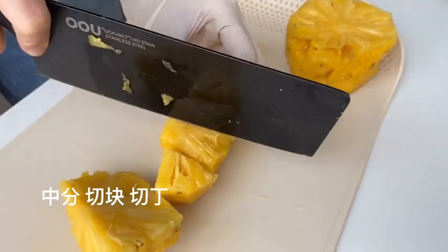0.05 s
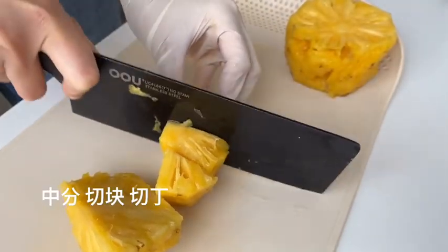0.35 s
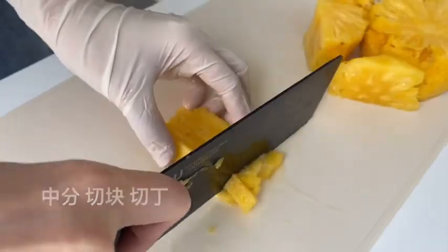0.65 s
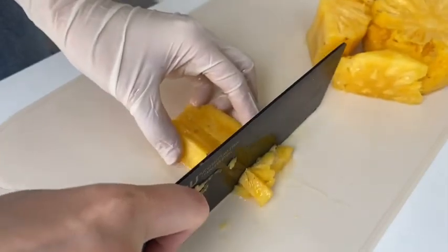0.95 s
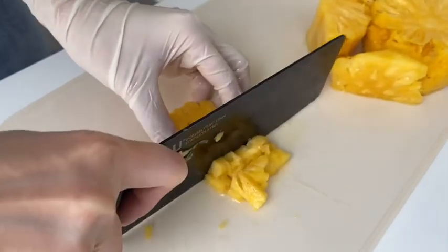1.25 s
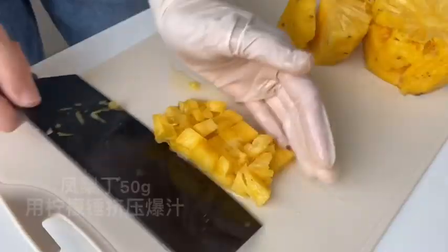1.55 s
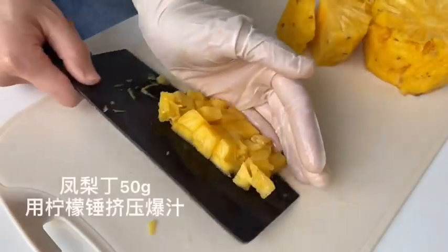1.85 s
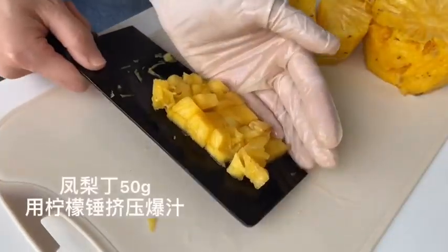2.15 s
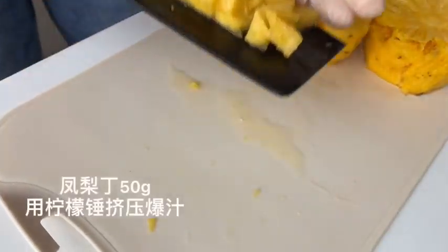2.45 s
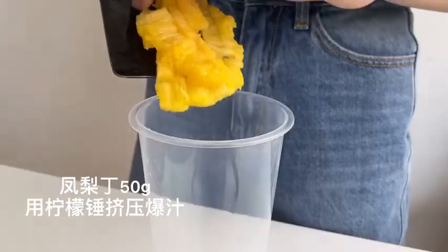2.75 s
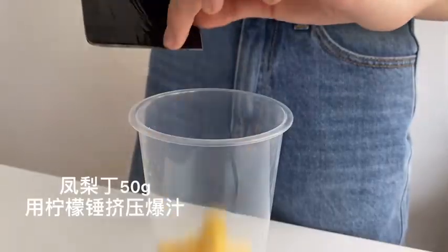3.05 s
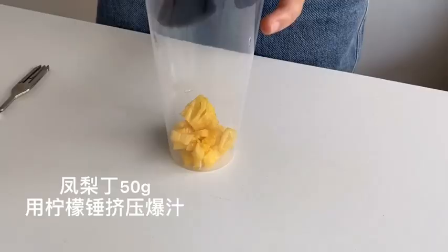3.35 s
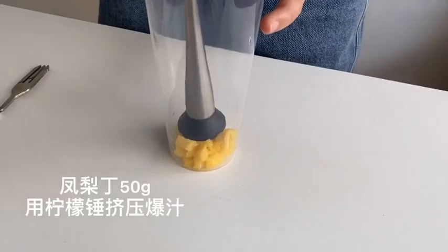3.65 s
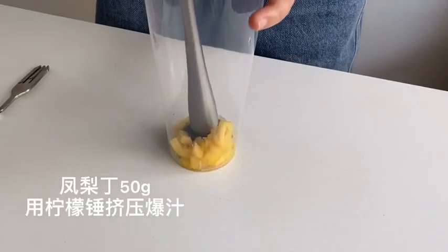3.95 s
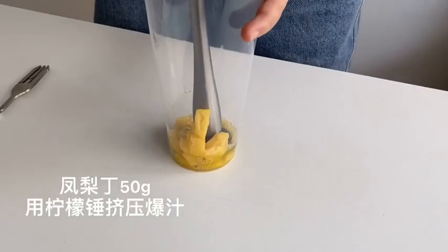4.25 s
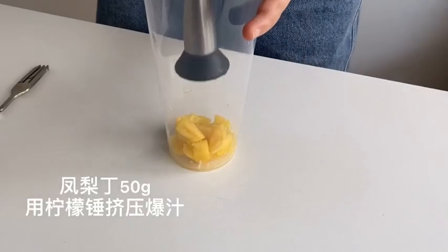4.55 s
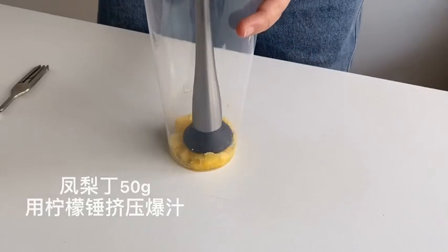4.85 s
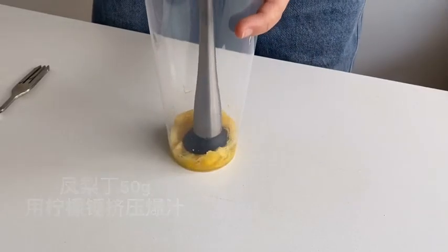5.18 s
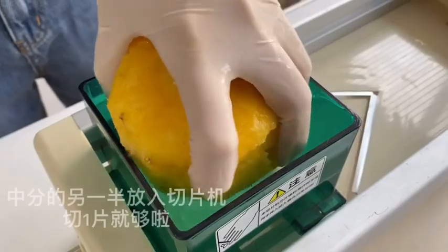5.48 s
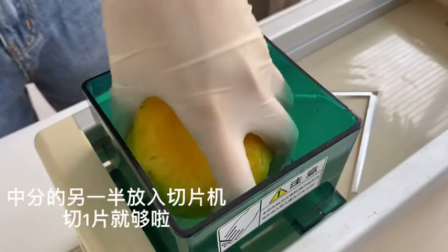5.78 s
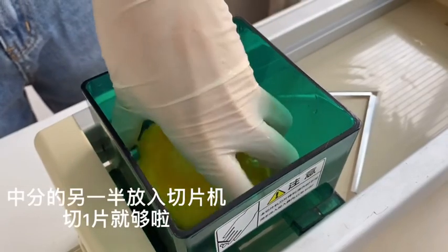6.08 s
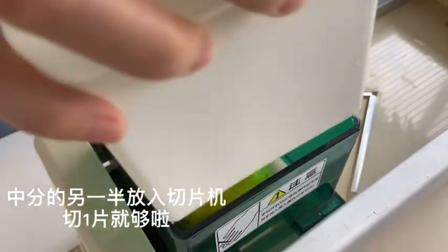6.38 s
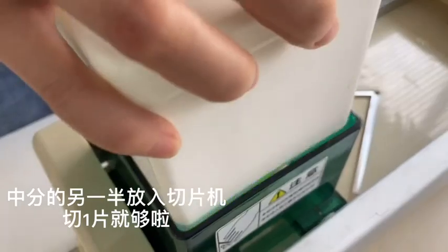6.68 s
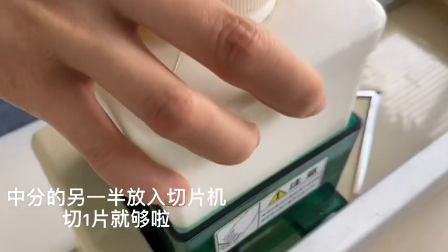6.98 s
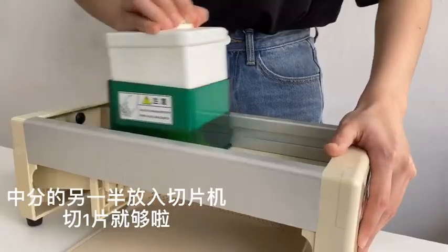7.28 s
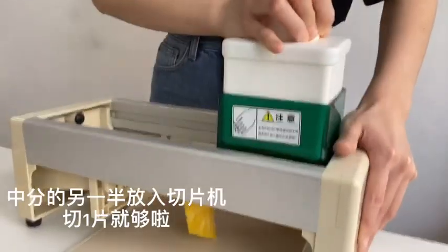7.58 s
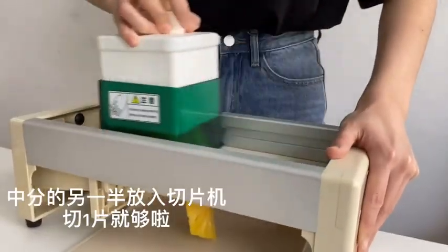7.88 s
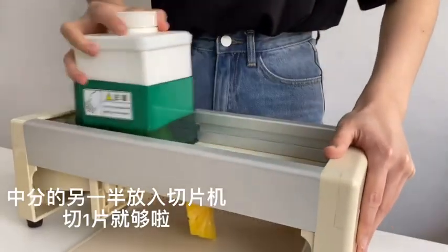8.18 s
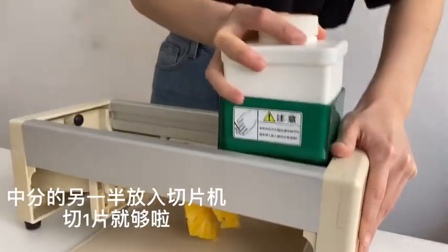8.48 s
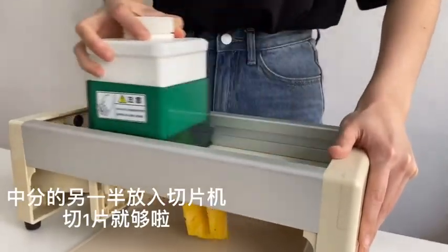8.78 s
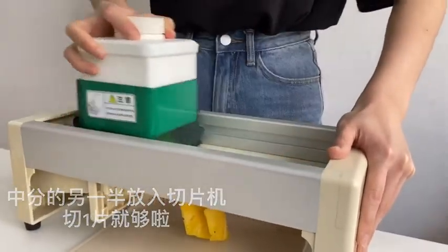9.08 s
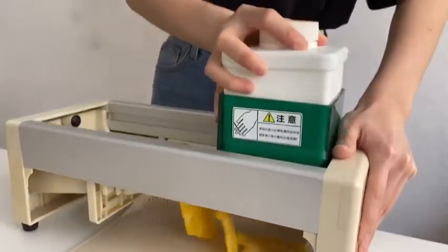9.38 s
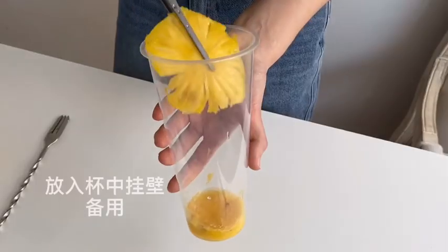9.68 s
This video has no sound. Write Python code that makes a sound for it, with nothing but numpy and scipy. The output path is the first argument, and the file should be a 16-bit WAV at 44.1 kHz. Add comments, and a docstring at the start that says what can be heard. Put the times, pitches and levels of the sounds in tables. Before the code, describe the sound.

A cleaver chops and scrapes on a plastic board, fruit squelches in a cup, then a hand slicer rasps back and forth, knocking.

```python
"""A cleaver crunches through pineapple, knocks on a plastic board and scrapes up the cubes, close by.
They plop into a plastic cup and squelch under a muddler (a crushing stick). A larger piece is pushed
into the hopper (feed box) of a hand slicer, the pusher groans into place, and the sliding carriage
rasps to and fro, hitting its end stops. Knocks are dying tones plus a burst of noise; rubbing is
grainy noise shaped by the thing rubbed. Underneath, the table rumbles and the kitchen hums."""
import sys
import numpy as np
from scipy import signal
from scipy.fft import rfft, irfft, next_fast_len
from scipy.io import wavfile
from scipy.ndimage import map_coordinates

SR = 44100
rng = np.random.default_rng(int(sys.argv[2]) if len(sys.argv) > 2 else 0)


def wav_record(signal):
    """Record a signal, one row per channel, as 16-bit PCM in the file named by sys.argv[1]."""
    frames = np.transpose(np.atleast_2d(signal))
    bounded = np.clip(frames, -1, 1)
    # unit amplitude maps onto the largest positive 16-bit level
    quanta = np.round(bounded * 32767).astype(np.int16)
    wavfile.write(sys.argv[1], SR, quanta)


N = 437901
TIME = np.arange(N) / SR


# The cleaver hits the board: (time [s], level [dB], brightness [dB per band])
CHOPS = [(0.2365, -17, -1.3), (0.5165, -25.5, -2.2), (0.657, -33.5, -1.5), (1.09, -30.5, -3),
         (1.243, -43, -8)]
# The board's ringing tones: (pitch [Hz], level [dB], ring time [s])
BOARD_TONES = [(95, -1, 0.075), (216.5, 10, 0.06), (246, -8.5, 0.23), (380, 0, 0.055), (1172, 14, 0.017),
               (1803, 5.5, 0.029), (2440, -1.5, 0.03)]
# The board's four bands, low to high: (thump [dB], knock [dB], clack [dB], crack [dB])
BOARD_COLOUR = (0.5, -9.5, -0.5, -8)
# The edge moves through fruit: (start [s], length [s], level [dB])
CUTS = [(0.0, 0.26, -48), (0.148, 0.23, -32.5), (0.48, 0.051, -37.5), (0.57, 0.2, -42), (1.0, 0.077, -41.5),
        (1.095, 0.065, -35.5)]
# Tone of tearing fibres: (frequency [Hz], level [dB])
CRUNCH_TONE = [(250, -15), (500, -4.5), (1000, -7), (1900, -7.5), (3500, -14), (7000, -17), (16000, -16)]

def cleaver_chops(cutting):
    """The edge crunches through wet fibres and lands on the board; both make the board ring."""
    board_ring = [(hz, np.log(1000) / np.pi / ring_s, 5) for hz, _, ring_s in BOARD_TONES]  # 5 dB boost
    crunch = friction(cutting, CRUNCH_TONE, board_ring,
                      grain_db=3.5, grain_hz=1400, surge_db=3, surge_hz=170)
    chops = blows(CHOPS, BOARD_TONES, BOARD_COLOUR,
                  contact_s=.00008, noise_db=1, noise_s=.052, crack_s=.012, rise_cycles=.28)
    return pan(crunch + chops, left_db=1.5)


# The flat blade sweeps the board: (start [s], length [s], level [dB], pitch [ratio])
SCRAPES = [(1.442, 0.063, -26.5, 1.015), (1.603, 0.048, -31.5, 0.95), (1.78, 0.051, -24, 1.065)]
# Tone of the scrape: (frequency [Hz], level [dB])
SCRAPE_TONE = [(450, -20.5), (680, -13.5), (820, -4), (2000, -10.5), (3200, -11.5), (5800, -11),
               (7500, -18), (15000, -20)]
# The blade sings: (pitch [Hz], width [Hz], boost [dB])
BLADE_RING = [(830, 50, 7), (1320, 35, 11), (1750, 60, 8), (2865, 55, 12), (4640, 80, 7), (5380, 70, 6)]
# The edge catches and judders: (start [s], length [s], level [dB])
JUDDERS = [(1.443, 0.075, -36.5), (1.598, 0.15, -41.5), (1.753, 0.021, -31)]
# Tone of the judder: (frequency [Hz], level [dB])
JUDDER_TONE = [(400, -11), (850, -15), (1800, -8.5), (5000, -19.5)]
# The caught edge rings: (pitch [Hz], width [Hz], boost [dB])
JUDDER_RING = [(910, 85, 33), (1723, 44, 17)]

def cleaver_scrapes():
    """The blade rasps at a new pitch each stroke and grows duller as it fills with fruit."""
    rasp = friction(1, SCRAPE_TONE, BLADE_RING, grain_db=2.5, grain_hz=800, surge_db=1, surge_hz=130)
    strokes = 0
    for *stroke, pitch in SCRAPES:
        pressure = envelope([stroke], attack_s=.032, release_s=.14)
        strokes += pressure * bend(rasp, pitch + .008 * drift(40, N))
    fullness = np.interp(TIME, [SCRAPES[0][0], SCRAPES[-1][0]], [0, 1])
    scrape = bass_and_treble(strokes, split_hz=2800, low_db=0, high_db=3 - 14.5 * fullness)
    judder = friction(envelope(JUDDERS, attack_s=.0048, release_s=.14), JUDDER_TONE, JUDDER_RING,
                      grain_db=1.5, grain_hz=260, surge_db=-.5, surge_hz=140)
    return pan(scrape + judder, left_db=3.5)


# The carriage hits an end stop: (time [s], level [dB], brightness [dB per band])
CARRIAGE_STOPS = [(7.4225, -18.5, -1.3), (8.344, -19, 1), (9.2195, -19.5, 0)]
# The carriage's tones: (pitch [Hz], level [dB], ring time [s])
CARRIAGE_TONES = [(150, -4, .08), (215, 0, .07), (370, -8, .06), (620, -7, .03), (750, 2, .032),
                  (1240, 0, .02), (2150, 0, .018), (3450, -3, .014)]
# The carriage's bands: (thump [dB], knock [dB], clack [dB], crack [dB])
CARRIAGE_COLOUR = (-6, 8, 1, -4.5)
# Return strokes, and the frame dropping on its feet: (time [s], level [dB], brightness [dB per band])
FRAME_BUMPS = [(7.5025, -19.5, -4.8), (7.953, -26, -1.7), (7.962, -28, -2), (8.385, -35, -7),
               (8.845, -26, -3.6), (9.258, -25, -7.4)]
# The frame's tones: (pitch [Hz], level [dB], ring time [s])
FRAME_TONES = [(148, 8, .1), (220, 2, .1), (365, 5, .035), (590, 8, .03), (1450, 8, .012), (2250, 0, .028)]
# The frame's bands: (thump [dB], knock [dB], clack [dB], crack [dB])
FRAME_COLOUR = (-4, 6, 1, -3)

def slicer_knocks():
    """Each stroke ends in a knock that rings the carriage or the frame."""
    stops = blows(CARRIAGE_STOPS, CARRIAGE_TONES, CARRIAGE_COLOUR,
                  contact_s=.0035, noise_db=-3, noise_s=.035, crack_s=.03, rise_cycles=1.3)
    bumps = blows(FRAME_BUMPS, FRAME_TONES, FRAME_COLOUR,
                  contact_s=.002, noise_db=-6, noise_s=.03, crack_s=.025, rise_cycles=.6)
    return pan(stops + bumps, left_db=1.5)


# The carriage slides to and fro: (start [s], length [s], level [dB])
TRAVELS = [(7.07, 0.014, -28.5), (7.125, 0.28, -30.5), (7.56, 0.37, -36), (8.1, 0.23, -30.5),
           (8.45, 0.36, -35.5), (8.9, 0.28, -34)]
# The slicer's blade bites the fruit: (start [s], length [s], level [dB])
BITES = [(8.104, 0.038, -27), (8.148, 0.027, -35), (9.071, 0.011, -26), (9.085, 0.082, -33.5)]
# Tone of the rails: (frequency [Hz], level [dB])
RAIL_TONE = [(110, -16.5), (190, 5), (380, 4.5), (1100, 5), (2000, 4.5), (3200, 3), (5000, -8.5),
             (9000, -52)]
# The rails ring: (pitch [Hz], width [Hz], boost [dB])
RAIL_RING = [(365, 50, 6), (545, 50, 9), (835, 55, 7), (1110, 60, 2), (1590, 100, 7), (2070, 110, 6),
             (3750, 160, 6)]
# Tone of the blade's hiss: (frequency [Hz], level [dB])
SLICE_TONE = [(2000, -26.5), (3600, -5.5), (5500, -1.5), (8000, -7), (11500, -6), (15500, -13.5)]

def slicer_strokes(travel):
    """The carriage rasps on its rails, the frame drones, and the blade hisses more when pushed harder."""
    graze_s = .011  # the carriage brushes each stop just before it hits
    grazes = [(s - graze_s, graze_s, -17) for s, _, _ in CARRIAGE_STOPS]
    grazing = envelope(grazes, attack_s=graze_s, release_s=.019)
    rasp = friction(1, RAIL_TONE, RAIL_RING, grain_db=3.5, grain_hz=350, surge_db=3.5, surge_hz=40)
    rails = (travel + grazing) * bend(rasp, 1 + .04 * drift(10, N))
    slicing = from_db(-30) * (travel / from_db(-28)) ** 1.54  # 1.54 dB more hiss per dB of rubbing
    hiss = friction(slicing, SLICE_TONE, [(5050, 200, 4.1)],
                    grain_db=3, grain_hz=900, surge_db=3, surge_hz=120)
    drone = from_db(-13.5) * travel * body(noise(N), RUMBLE_TONE, [(148, 28, 16)])
    return pan(rails + hiss + drone, left_db=1.5)


# Fruit and pusher hit the hopper: (time [s], level [dB], brightness [dB per band])
HOPPER_KNOCKS = [(5.411, -34, 2), (5.648, -38, -2.5), (5.792, -44, 7), (5.831, -37, 2.5), (6.012, -39, -2),
                 (6.065, -33.5, -3.5), (6.084, -40, -9.5), (6.135, -51, -10.5), (6.162, -28, 1.5),
                 (6.222, -22.5, -0.5), (6.26, -32, 4.5), (6.289, -46, -14.5), (6.55, -33.5, -1),
                 (6.568, -28, 0.5), (6.604, -29, 3), (6.617, -28, 1), (6.985, -46, -8.5)]
# The hopper's tones: (pitch [Hz], level [dB], ring time [s])
HOPPER_TONES = [(72, -4, .14), (98, 2, .14), (128, -3, .09), (245, -1, .07), (400, -4, .035), (640, 0, .04),
                (921, -1, .05), (1400, 0, .015), (2270, -3, .02), (3850, -3, .012)]
# The hopper's bands: (thump [dB], knock [dB], clack [dB], crack [dB])
HOPPER_COLOUR = (0.92, -0.36, -2, 0.43)
# Fruit and pusher rub the walls: (start [s], length [s], level [dB])
RUBS = [(5.392, 0.16, -38), (5.65, 0.21, -38), (6.01, 0.18, -40.5), (6.214, 0.018, -20.5),
        (6.45, 0.029, -29.5), (6.56, 0.13, -30), (6.63, 0.12, -33.5), (6.95, 0.043, -38)]
# Tone of the walls: (frequency [Hz], level [dB])
WALL_TONE = [(220, -21), (380, 4.5), (700, 1), (1200, -4), (2300, -5.5), (4500, -11), (8000, -17.5),
             (16000, -41)]
# Wet fruit and a rubber glove stick and slip: (start [s], length [s], level [dB])
SLIPS = [(5.402, .022, -24.5), (5.463, 0.011, -27.5), (5.522, 0.0085, -32), (5.708, 0.019, -36),
         (5.791, 0.01, -26.5), (5.828, 0.0047, -22.5)]
# Tone of a slip: (frequency [Hz], level [dB])
SLIP_TONE = [(300, -11.5), (800, 3), (2500, -4.5), (4200, -3), (7000, -11), (16000, -18)]
# The pusher jams and groans: (start [s], length [s], level [dB])
GROANS = [(6.163, 0.023, -23), (6.213, 0.022, -30), (6.45, 0.12, -45), (6.565, 0.074, -26.5),
          (6.65, 0.095, -30.5), (6.75, 0.21, -35.5), (6.955, 0.022, -27.5)]
# Tone of the groan: (frequency [Hz], level [dB])
GROAN_TONE = [(150, -10), (330, -1.5), (1000, -3.5), (2300, -11.5), (2800, -16), (8000, -28.5)]
# The rubbed box rings: (pitch [Hz], width [Hz], boost [dB])
HOPPER_RING = [(650, 100, 7), (922, 40, 17), (1380, 60, 7), (2270, 70, 9), (3780, 70, 9)]

def hopper(rubbing):
    """Wet fruit slips into a hollow plastic box; the pusher knocks, rubs and groans with a wavy pitch."""
    knocks = blows(HOPPER_KNOCKS, HOPPER_TONES, HOPPER_COLOUR,
                   contact_s=.003, noise_db=-2, noise_s=.045, crack_s=.035, rise_cycles=1)
    rub = friction(rubbing, WALL_TONE, HOPPER_RING, grain_db=3.5, grain_hz=580, surge_db=2, surge_hz=100)
    slips = friction(envelope(SLIPS, attack_s=.0017, release_s=.027), SLIP_TONE, [],
                     grain_db=2.5, grain_hz=1300, surge_db=-1, surge_hz=200)
    hollow = friction(.97, GROAN_TONE, HOPPER_RING, grain_db=.5, grain_hz=170, surge_db=-5, surge_hz=150)
    groan = envelope(GROANS, attack_s=.009, release_s=.13) * bend(hollow, 1 + .015 * drift(18, N))
    return pan(knocks + rub + slips + groan, left_db=1.7)


# Cubes and muddler tap the cup: (time [s], level [dB], brightness [dB per band])
CUP_TAPS = [(3.007, -33, -2.5), (3.055, -29, -2.5), (3.563, -51.5, 1.5), (4.276, -47, -5),
            (4.343, -46, -3.5)]
# The cup's tones: (pitch [Hz], level [dB], ring time [s])
CUP_TONES = [(517.7, 12, 0.16), (860, 17, 0.013), (1330, 28, 0.0095), (1580, 4.7, 0.0069)]
# The cup's bands: (thump [dB], knock [dB], clack [dB], crack [dB])
CUP_COLOUR = (-10, 7, 4, -6)
# The muddler bumps the table through the cup: (time [s], level [dB], brightness [dB per band])
MUDDLER_BUMPS = [(4.616, -33, -3.3), (5.238, -47, -8.5)]
# The table's tones: (pitch [Hz], level [dB], ring time [s])
TABLE_TONES = [(152, -2.2, 0.049), (198, 0, 0.029), (423, 0, 0.011), (1360, 0, 0.0042)]
# The table's bands: (thump [dB], knock [dB], clack [dB], crack [dB])
TABLE_COLOUR = (-0.28, 0.13, -0.18, -0.31)
# Wet pulp is squashed: (start [s], length [s], level [dB])
SQUELCHES = [(2.995, 0.053, -39.5), (3.575, 0.028, -48), (3.72, 0.14, -51.5), (3.845, 0.044, -40.5),
             (3.95, 0.2, -54), (4.27, 0.092, -47), (4.66, 0.22, -51), (4.86, 0.051, -41.5),
             (4.97, 0.25, -57)]
# Tone of the pulp: (frequency [Hz], level [dB])
PULP_TONE = [(250, 11), (500, 1.5), (900, 0.5), (1600, -2), (3000, -1.5), (6000, -8), (16000, -14)]
# The cup rings around it: (pitch [Hz], width [Hz], boost [dB])
CUP_RING = [(512, 45, 15), (1400, 260, 5)]
# Juice squirts past the muddler: (start [s], length [s], level [dB])
SQUIRTS = [(3.733, 0.0093, -38), (4.273, 0.0058, -35.5)]
# Tone of a wet hiss: (frequency [Hz], level [dB])
WET_TONE = [(1500, -12), (3200, -6), (5000, -7.5), (6800, 1), (8500, -18), (15000, -11)]
# The squirt whistles: (pitch [Hz], width [Hz], boost [dB])
SQUIRT_RING = [(4300, 90, 8.7), (5300, 160, 13)]

def cup():
    """Cubes drop into the cup; the muddler squashes out their juice and bumps the table."""
    taps = blows(CUP_TAPS, CUP_TONES, CUP_COLOUR,
                 contact_s=.00045, noise_db=-3, noise_s=.025, crack_s=.013, rise_cycles=.62)
    bumps = blows(MUDDLER_BUMPS, TABLE_TONES, TABLE_COLOUR,
                  contact_s=.00011, noise_db=-4, noise_s=.029, crack_s=.0013, rise_cycles=.38)
    squelch = friction(envelope(SQUELCHES, attack_s=.0026, release_s=.33), PULP_TONE, CUP_RING,
                       grain_db=4.5, grain_hz=2000, surge_db=3, surge_hz=100)
    squirt = friction(envelope(SQUIRTS, attack_s=.004, release_s=.09), WET_TONE, SQUIRT_RING,
                      grain_db=3.5, grain_hz=900, surge_db=1.5, surge_hz=150)
    return pan(taps + bumps + squelch + squirt, left_db=2.5)


# Fibres snap and juice ticks: (time [s], level [dB], pitch [Hz])
TICKS = [(3.598, -43, 3130), (3.870, -40.5, 3140), (4.713, -42, 4300), (5.054, -47.5, 4130),
         (5.619, -37, 3320), (5.661, -30, 4600), (5.768, -31, 4000), (6.132, -30, 11300),
         (7.32, -30.5, 6300), (7.72, -40.5, 4830), (7.774, -32, 5770), (7.822, -31, 5850),
         (8.045, -28, 4600), (8.236, -26.5, 5020), (8.656, -34, 4800), (8.71, -29, 4800),
         (8.805, -31, 4800)]

def ticks():
    """A fibre or a film of juice lets go with a short snap, strongest around its own pitch."""
    out, t = np.zeros((2, N)), np.arange(SR // 16) / SR
    for s, db, hz in TICKS:
        burst = spread(noise(len(t)), hz) * from_db(-60 * t / .032) * np.minimum(t / .002, 1)
        snap = band(burst, hz / 1.113, hz * 1.113) + from_db(-5) * band(burst, hz / 4.7, hz * 2)
        add(out, s, from_db(db) * snap / np.std(snap[:, t < .006]))
    return out


# Hollow pops and rubbery squeaks under wet fruit: (start [s], length [s], level [dB], pitch [Hz])
POPS = [(2.976, 0.022, -39, 564), (3.026, 0.004, -24.5, 1300), (5.394, 0.02, -30, 736),
        (5.646, 0.011, -15.5, 703)]

def pops():
    """A squeezed-out pocket of air, or a rubbery squeak, sounds for a moment, sagging in pitch."""
    out, t = np.zeros((2, N)), np.arange(SR // 20) / SR
    sag = np.exp(-8.6 * t)
    for s, length, db, hz in POPS:
        phase = 2 * np.pi * hz * np.cumsum(sag) / SR
        level = np.minimum(t / .003, 1) * from_db(db - 60 * np.maximum(t - length, 0) / .025)
        add(out, s, (level * np.sin(phase))[None])
    return out


# Wet fruit slides in the cup: (start [s], length [s], level [dB])
SLICE_SLIDES = [(9.61, 0.23, -55.5)]

def wet_slice():
    """A thin slice hisses along the wall of the cup."""
    slide = envelope(SLICE_SLIDES, attack_s=.033, release_s=.49)
    hiss = friction(slide, WET_TONE, [], grain_db=3.5, grain_hz=2100, surge_db=-1, surge_hz=55)
    return pan(hiss, left_db=3.5)


# The kitchen's echo: (frequency [Hz], ring time [s], level [dB])
KITCHEN_ECHO = [(150, 0.3, -26.5), (372, 0.22, -23.5), (830, 0.33, -27.5), (2200, 0.33, -21),
                (5000, .25, -18), (11000, 0.11, -19.5)]

def kitchen_echo(x):
    """Many reflections blur into a short tail that dies soonest in the high treble."""
    t, response = np.arange(SR // 2) / SR, 0
    build_up = np.minimum(t / .0075, 1) ** 2
    for hz in 90 * 2. ** np.arange(8):
        tail = band(spread(noise(len(t)), hz), hz / np.sqrt(2), hz * np.sqrt(2))
        tail *= from_db(-60 * t / at_hz(KITCHEN_ECHO, hz)) * build_up
        response += from_db(at_hz(KITCHEN_ECHO, hz, column=2)) * unit_power(tail) / np.sqrt(len(t))
    return signal.fftconvolve(x, response, axes=1)[:, :N]


# The background steps to new levels at set times: (start [s], hum [dB], rumble [dB], air [dB], hiss [dB])
BACKGROUND_STEPS = [(0, -47.5, -47, -37, -90), (2.61, -48, -50.5, -46, -71.5),
                    (3.305, -46, -52, -36.5, -76.5), (5.272, -71, -44, -32.5, -59),
                    (7.07, -60.5, -39.5, -42, -70.5), (9.38, -52, -52.5, -43, -85)]
# Tone of the room: (frequency [Hz], level [dB])
ROOM_TONE = [(20, -24), (35, -8.5), (58, 9), (85, -11.5), (300, -30), (1000, -30.5), (2000, -38.5),
             (4000, -55), (16000, -61.5)]
# Tone of the table's rumble and the slicer's drone: (frequency [Hz], level [dB])
RUMBLE_TONE = [(20, -30.5), (40, -16.5), (90, -3.5), (150, 5.5), (230, 2.5), (330, 1.5), (480, -15.5),
               (900, -28.5), (3000, -65.5)]

def background(shaking):
    """Hum and soft air fill the room; the table rumbles under the hands, more when they rub or cut."""
    steps = np.array(BACKGROUND_STEPS)
    hum_db, rumble_db, air_db, hiss_db = steps[np.searchsorted(steps[1:, 0], TIME), 1:].T
    room = bass_and_treble(body(noise(N), ROOM_TONE), split_hz=130, low_db=hum_db, high_db=air_db)
    rumble = friction(np.hypot(from_db(rumble_db), shaking), RUMBLE_TONE, [],
                      grain_db=1.5, grain_hz=200, surge_db=2, surge_hz=25)
    hiss = from_db(hiss_db) * unit_power(band(noise(N), 2600, 7400))
    return room + rumble + hiss


# Borders of the thump, knock, clack and crack bands: (frequency [Hz])
BAND_EDGES = [50, 300, 1100, 3400, 9500]

def blows(hits, tones, colour_db, contact_s, noise_db, noise_s, crack_s, rise_cycles):
    """Each hit rings an object's main tones over a quickly dying burst of noise, band by band."""
    out, t = np.zeros((2, N)), np.arange(SR // 4) / SR
    attack = t < .018
    for s, level_db, brightness_db in hits:
        levels = level_db + np.array(colour_db) + brightness_db * (np.arange(4) - 1.5)
        for low, high, db in zip(BAND_EDGES, BAND_EDGES[1:], levels):
            centre = np.sqrt(low * high)
            band_tones = [tone for tone in tones if low <= tone[0] < high]
            fade_s = noise_s * (1000 / centre) ** .4 if band_tones else crack_s
            contact = 1 - np.exp(-(t / contact_s) ** 2)  # the surfaces take a moment to meet fully
            burst = band(spread(noise(len(t)), centre) * contact * from_db(-60 * t / fade_s), low, high)
            ring = ringing(band_tones, t, rise_cycles)
            sound = from_db(noise_db) * burst / np.std(burst[:, attack])
            sound += ring / (np.std(ring[:, attack]) + 1e-12)
            add(out, s, from_db(db) * sound / np.std(sound[:, attack]))
    return out


def ringing(tones, t, rise_cycles):
    """Struck tones swell, low ones more slowly, and fall by 60 dB in their ring time."""
    ring = np.zeros((2, len(t)))
    for hz, db, ring_s in tones:
        strength, detune, direction = rng.standard_normal(3)
        # each tone spreads its own way and reaches left and right out of step
        skew = (.3 * direction - 1) * np.arccos(at_hz(LIKENESS, hz)) / 3
        wave = np.sin(2 * np.pi * hz * (1 + .02 * detune) * t + np.array([[-skew], [skew]]))
        swell = 1 - np.exp(-(t * hz / rise_cycles) ** 2)
        ring += wave * swell * from_db(db + 1.5 * strength - 60 * t / ring_s)
    return ring


def friction(gain, tone, rings, grain_db, grain_hz, surge_db, surge_hz):
    """Tiny uneven slips (grain), bunched in slower surges, shake an object while it is rubbed."""
    force, shared = 0, drift(surge_hz, N)
    # coarse, medium and fine slips share only part of each surge
    for low, high in [(20, 1500), (1500, 5000), (5000, 18000)]:
        surge = np.minimum((shared + drift(surge_hz, N)) / np.sqrt(2), 2)
        grain = np.minimum(drift(grain_hz, N), 3)
        force += band(noise(N) * from_db(grain_db * grain + surge_db * surge), low, high)
    return gain * body(force, tone, rings)


def body(force, tone, rings=()):
    """An object gives a force its broad tone and boosts the pitches it rings at; the power is 1."""
    size = next_fast_len(force.shape[1] + SR // 8, real=True)
    hz = np.arange(size // 2 + 1) * SR / size
    boost = 1 + sum((from_db(db) - 1) / (1 + 2j * (hz - pitch) / width) for pitch, width, db in rings)
    sound = irfft(spread(rfft(force, size), hz) * from_db(at_hz(tone, hz)) * boost, size)
    return unit_power(sound[:, :force.shape[1]])


def envelope(rows, attack_s, release_s):
    """Loudness over time: each contact builds up, holds, then dies by 60 dB in release_s."""
    power = 0
    for start, length, db in rows:
        rise = np.clip((TIME - start) / attack_s, 0, 1)
        released = np.clip((TIME - start - length) / release_s, 0, 2)
        power += (rise * from_db(db - 60 * released)) ** 2
    return np.sqrt(power)


# How alike left and right are: (frequency [Hz], likeness [0-1])
LIKENESS = [(60, .97), (300, .83), (700, .62), (2000, .45), (11000, .65)]

def spread(pair, hz):
    """Blend two unrelated signals into left and right, most alike in the bass."""
    alike = at_hz(LIKENESS, hz)
    mid, side = np.sqrt((1 + alike) / 2) * pair[0], np.sqrt((1 - alike) / 2) * pair[1]
    return np.array([mid + side, mid - side])


def pan(x, left_db):
    """Lean a sound to the left."""
    return x * from_db([[left_db / 2], [-left_db / 2]])


def bend(x, ratio):
    """Bend a steady sound's pitch by playing it at a changing speed."""
    return np.array([map_coordinates(side, [np.cumsum(ratio)], order=3, mode="mirror") for side in x])


def drift(rate, size):
    """A random wander of power 1 that turns rate times a second."""
    points = rng.standard_normal(size // 8)
    return unit_power(np.interp(TIME[:size] * rate, np.arange(len(points)), points))


def noise(size):
    """Two channels of white noise."""
    return rng.standard_normal((2, size))


def band(x, low, high):
    """Keep the frequencies from low to high."""
    return signal.sosfilt(signal.butter(2, [low, min(high, .45 * SR)], "band", fs=SR, output="sos"), x)


def bass_and_treble(x, split_hz, low_db, high_db):
    """Set separate levels below and above split_hz."""
    return from_db(low_db) * band(x, 12, split_hz) - from_db(high_db) * band(x, split_hz, 19000)


def at_hz(table, hz, column=1):
    """Read between a table's rows on a log-frequency scale."""
    table = np.array(table)
    return np.interp(np.log(hz + 1e-9), np.log(table[:, 0]), table[:, column])


def add(out, s, sound):
    """Mix a short sound in at time s."""
    start = max(0, round(s * SR))
    out[:, start:start + sound.shape[1]] += sound[:, :N - start]


def from_db(db):
    """Decibels to gain."""
    return 10 ** (np.asarray(db) / 20)


def unit_power(x):
    """Scale to an average power of 1."""
    return x / np.sqrt(np.mean(x ** 2) + 1e-20)


# The whole sound dips briefly: (time [s], length [s], level change [dB])
DIPS = [(0.439, 0.031, -15.5), (2.606, 0.025, -33), (3.303, 0.017, -24), (6.199, 0.019, -54),
        (7.068, 0.012, -53)]

def scene():
    """All the work on one table in a small kitchen, over a low hum."""
    cutting = envelope(CUTS, attack_s=.018, release_s=.25)
    rubbing = envelope(RUBS, attack_s=.0044, release_s=.26)
    travel = envelope(TRAVELS, attack_s=.08, release_s=.51)
    travel += envelope(BITES, attack_s=.006, release_s=.027)
    shaking = from_db(2) * cutting + from_db(-2) * rubbing
    work = cleaver_chops(cutting) + cleaver_scrapes() + slicer_knocks() + slicer_strokes(travel)
    work += hopper(rubbing) + cup() + ticks() + pops()
    cut_off = np.clip((9.385 - TIME) / .01, 0, 1)  # the slicer's ringing and its echo stop short
    dip_db = sum(db * np.exp(-(2 * (TIME - s) / length) ** 4) for s, length, db in DIPS)
    return ((work + kitchen_echo(work)) * cut_off + wet_slice() + background(shaking)) * from_db(dip_db)


def record(dry):
    """The right side is one sample late; loud peaks are rounded and treble above 15900 Hz is cut."""
    pair = np.array([dry[0], np.pad(dry[1], (1, 0))[:N]])
    rounded = pair / (1 + pair ** 6) ** (1 / 6)
    return signal.sosfilt(signal.ellip(10, .3, 80, 15900, fs=SR, output="sos"), rounded)


dry = scene()
out = record(dry)
wav_record(out)
```